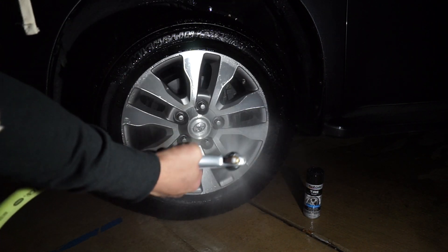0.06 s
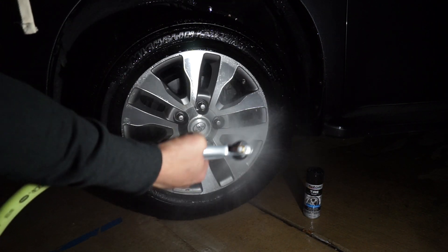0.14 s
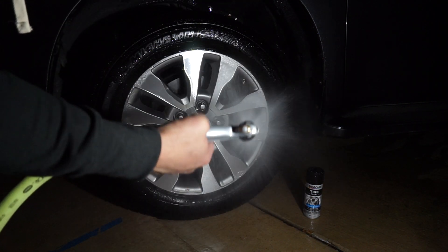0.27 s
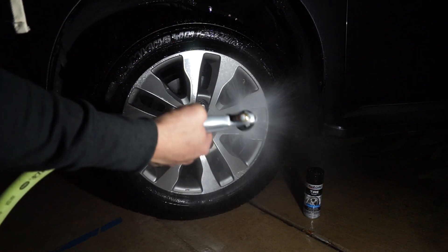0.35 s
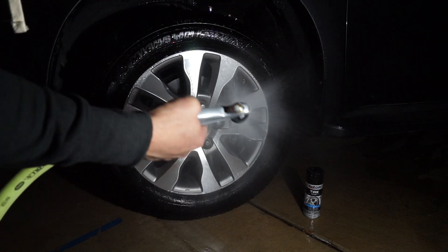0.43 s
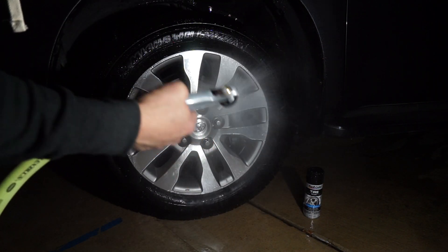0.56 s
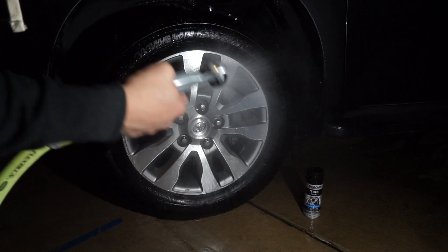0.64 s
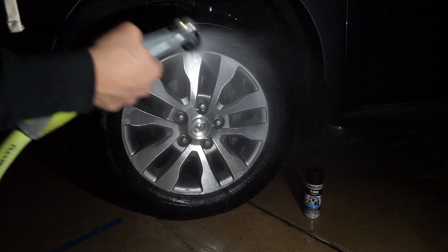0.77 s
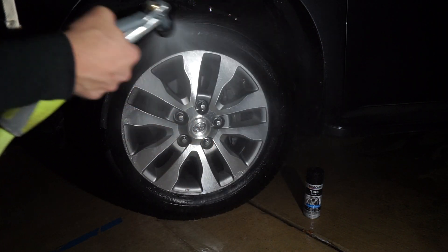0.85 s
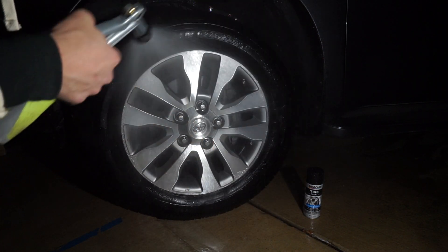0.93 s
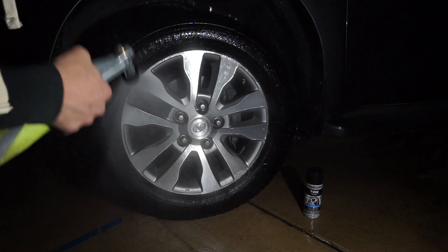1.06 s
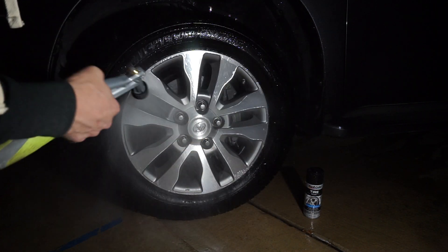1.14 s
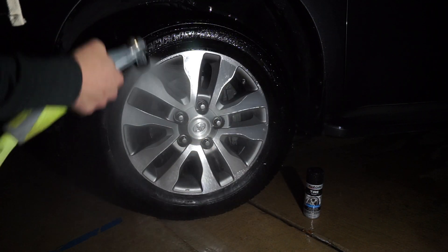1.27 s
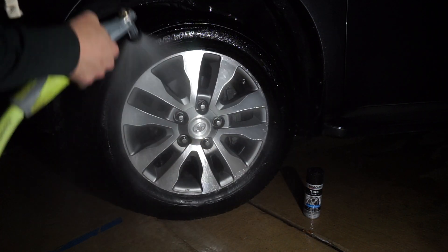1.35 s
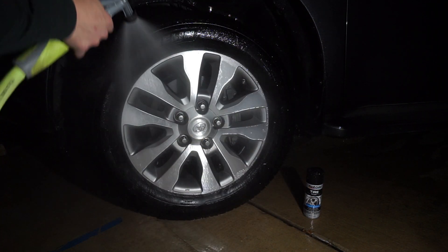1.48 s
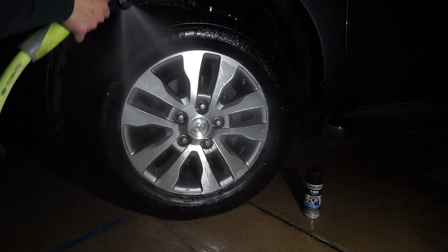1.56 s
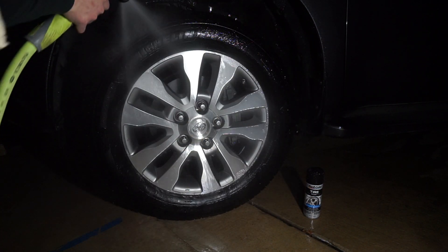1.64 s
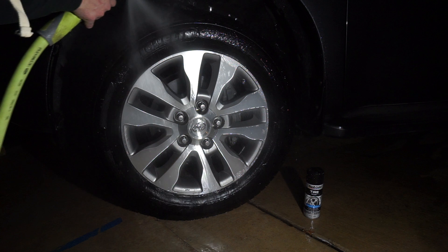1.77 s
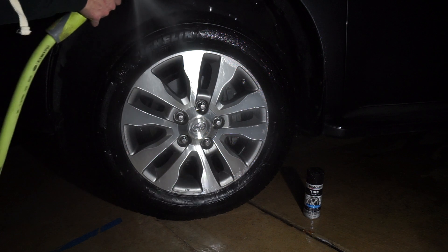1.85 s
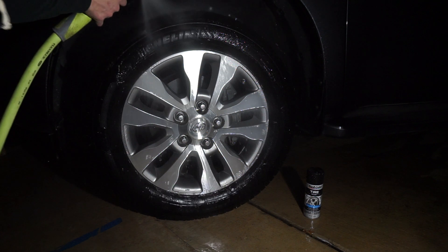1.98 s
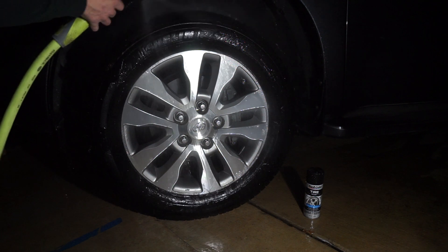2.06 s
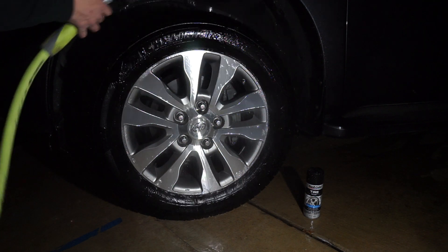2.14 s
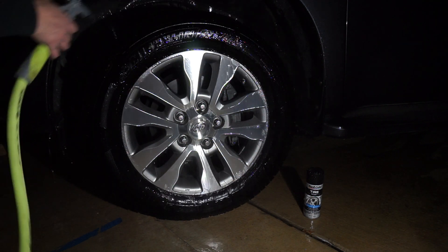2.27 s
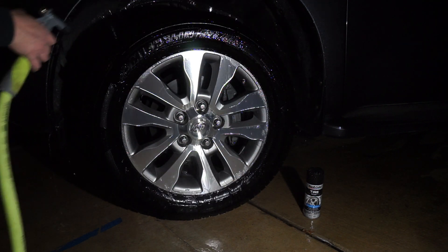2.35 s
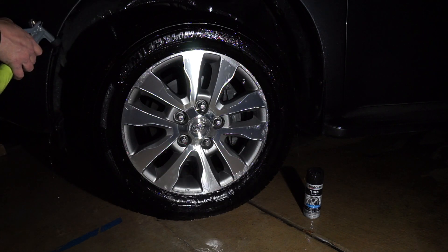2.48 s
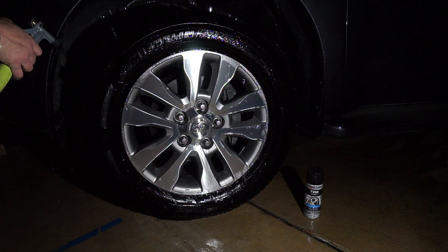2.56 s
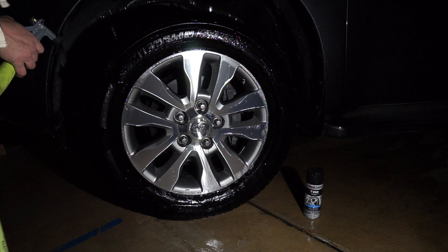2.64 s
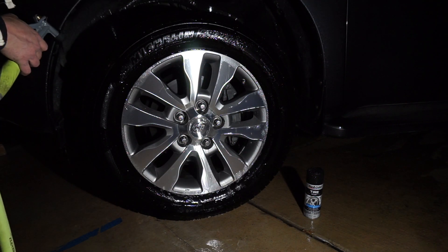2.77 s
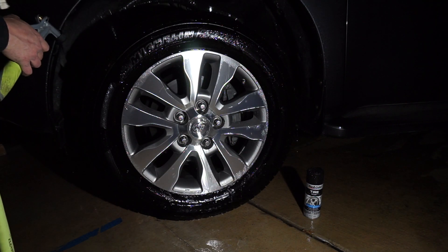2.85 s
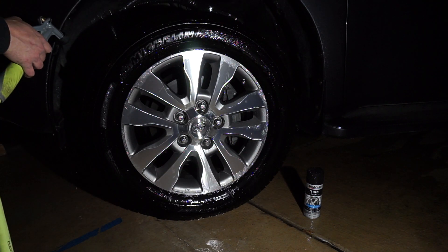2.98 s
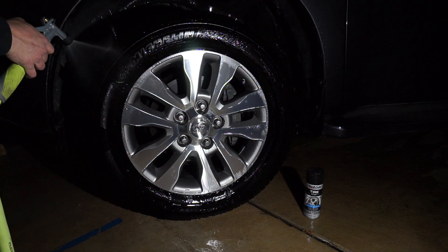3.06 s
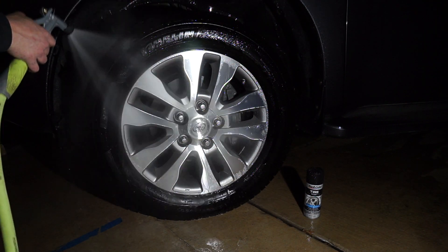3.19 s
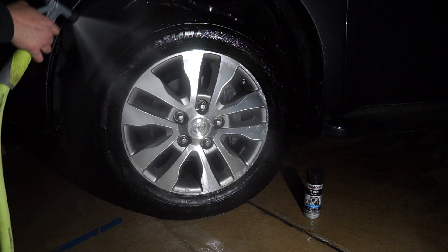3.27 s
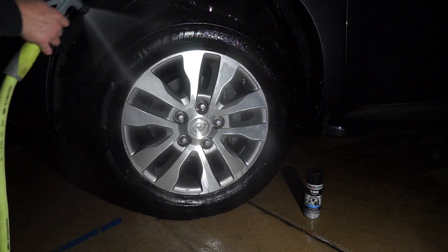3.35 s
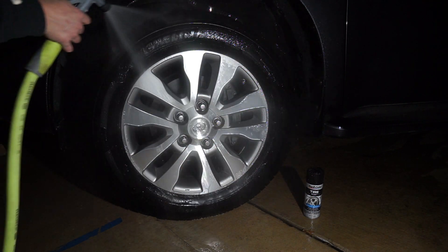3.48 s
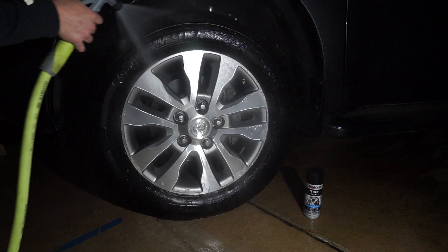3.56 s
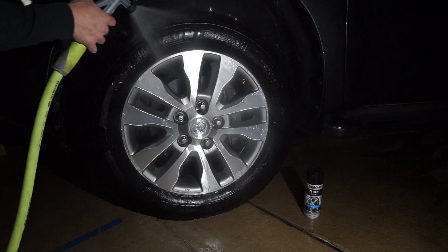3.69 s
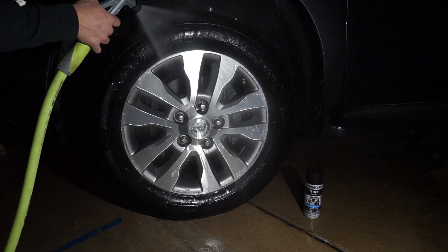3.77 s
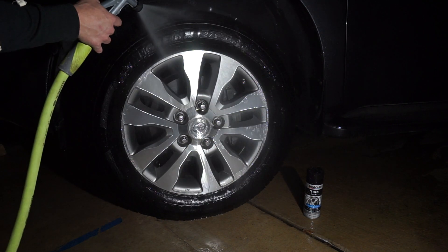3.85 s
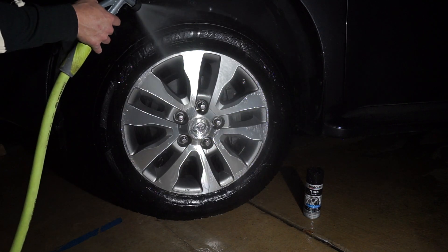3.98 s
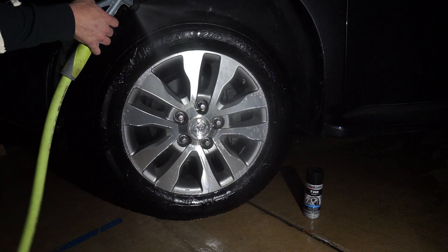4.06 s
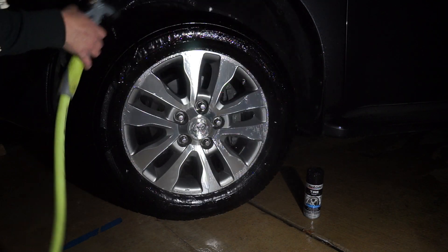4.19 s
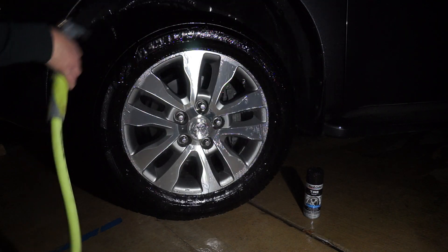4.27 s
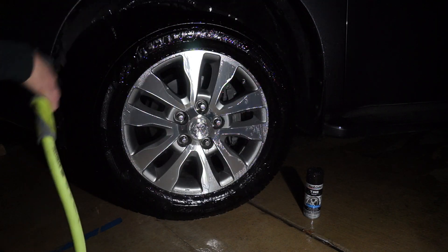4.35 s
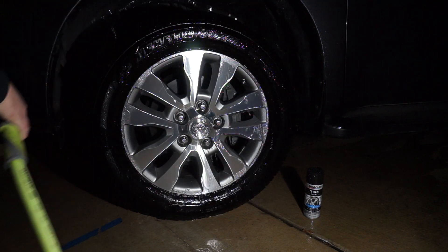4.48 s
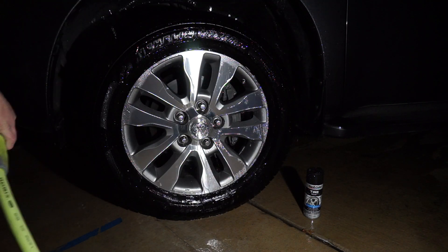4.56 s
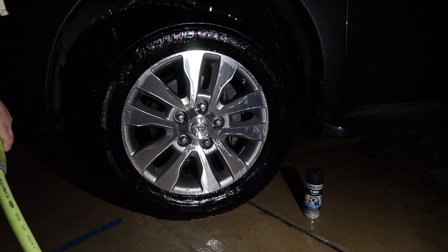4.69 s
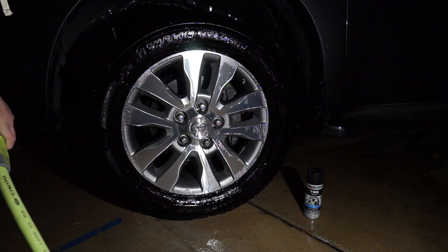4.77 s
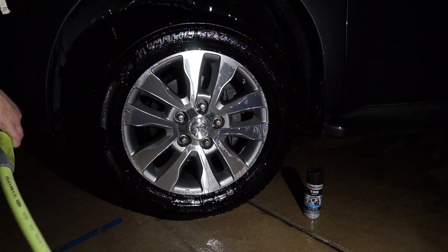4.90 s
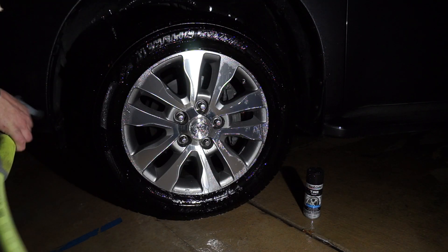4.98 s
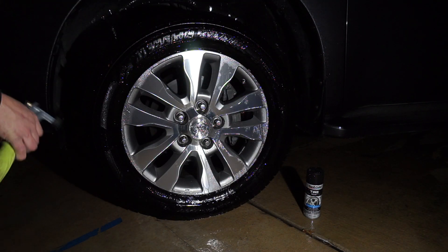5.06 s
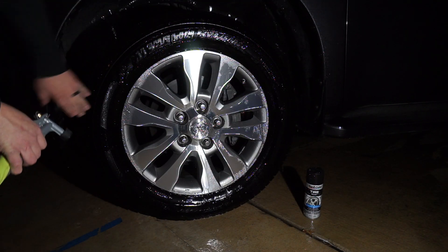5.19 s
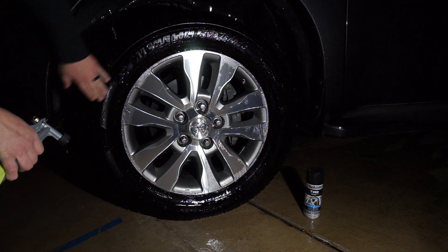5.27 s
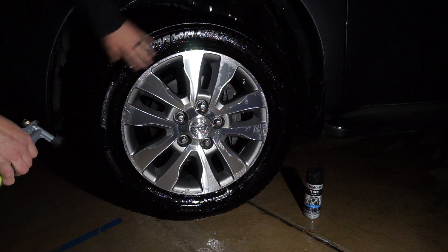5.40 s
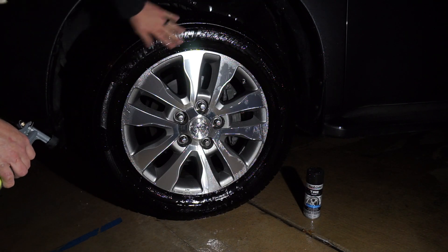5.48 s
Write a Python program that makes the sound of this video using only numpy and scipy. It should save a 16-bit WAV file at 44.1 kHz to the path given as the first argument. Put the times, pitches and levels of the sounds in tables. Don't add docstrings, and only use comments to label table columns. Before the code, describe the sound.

From 0 to 2.1 s a hose nozzle is already spraying: dense, bright hiss with coarse drops pelting metal spokes, a shifting narrow ring around 2 to 2.8 kHz and hollow rim resonance, strongest near 0.2-0.5 s and again at 1.1-1.5 s. The spray shuts off quickly, leaving fizzing, gurgling run-off, small rising bubble plinks and crisp drop splats until 3.0 s over faint distant traffic rumble. At about 3.1 s the spray snaps back, less metallic, drumming on tyre; from 3.4 s the sheet metal thuds and hums near 350 Hz. It stops at 4.1 s with a slosh and brief ringing decay. A soft low hose slap comes at 4.4 s, then thin trickle and scattered drips, the sharpest around 4.98 s. From 5.4 s to the end, a hand rubs and squeaks on wet rubber, rising then falling in pitch. Close stereo, leaning left, with short diffuse outdoor echoes.

```python
import sys
import numpy as np
from scipy import signal
from scipy.fft import rfft, irfft, next_fast_len
from scipy.io import wavfile
from scipy.ndimage import uniform_filter1d, map_coordinates

SR = 44100
rng = np.random.default_rng(int(sys.argv[2]) if len(sys.argv) > 2 else 0)


def transcribe(u):
    v = np.clip(np.atleast_2d(u).T, -1, 1)
    q = np.round(v * 32767).astype(np.int16)
    wavfile.write(sys.argv[1], SR, q)


def ratio(d):
    e = np.asarray(d, float) / 20
    return 10 ** e


N = 243927
TIME = np.arange(N) / SR
SIZE = next_fast_len(N + SR)
HZ = np.maximum(np.arange(SIZE // 2 + 1) * SR / SIZE, 1)

# (frequency [Hz], left-right likeness [0-1])
NEAR_ALIKE = [(60, 0.92), (130, 0.98), (290, 1), (640, 0.95), (1410, 0.86), (3100, 0.79), (6820, 0.57),
              (15000, 0.69)]
# (frequency [Hz], left-right likeness [0-1])
FAR_ALIKE = [(60, 0.9), (130, 1), (290, 0.9), (640, 0.6), (1410, 0.37), (3100, 0.14), (6820, 0.087),
             (15000, 0.45)]
DROPS_OPEN_POWER = 2.7


def rms_one(x):
    return x / np.sqrt(np.mean(x ** 2) + 1e-20)


def in_time(*tables):
    s, *columns = np.concatenate(tables).T
    return [np.interp(TIME, s, column) for column in columns]


def at_hz(points):
    hz, value = np.transpose(points)
    return np.interp(np.log(HZ), np.log(np.maximum(hz, 1)), value)


def sides(pan_db):
    return ratio(np.array([pan_db / 2, -pan_db / 2]))


def drift(rate):
    knots = rng.standard_normal(int(N / SR * 60) + 9)
    coarse_time = TIME[::64]
    place = np.minimum(coarse_time * rate, len(knots) - 3)
    return np.interp(TIME, coarse_time, map_coordinates(knots, [place], order=3))


def held(rows, on_db_per_s, off_db_per_s):
    levels = []
    for start, stop, db in rows:
        rise = on_db_per_s * np.maximum(start - TIME, 0)
        fall = off_db_per_s * np.maximum(TIME - stop, 0)
        levels.append(db - rise - fall)
    return np.max(levels, axis=0)


def valve(off_db_per_s, power):
    # (squeezed [s], let go [s])
    sprays = [
        (-1.0, 2.093),
        (3.055, 4.116),
    ]
    open_s = 0.081
    flow = 0
    for start, stop in sprays:
        opening = np.clip((TIME - start) / open_s, 0, 1) ** power
        flow = flow + opening * ratio(-off_db_per_s * np.maximum(TIME - stop, 0))
    return flow


def two_ports(mid, side, alike):
    # (frequency [Hz], lead of the left [rad])
    port_phase = [(20, 0), (2700, 0), (3450, .6), (4900, 1.8), (5900, 2.1), (7150, .1), (11300, .4),
                  (16000, .3)]
    likeness = np.clip(at_hz(alike), 0, .998)
    turn = np.exp(.5j * at_hz(port_phase))
    common, apart = np.sqrt(1 + likeness) * mid, np.sqrt(1 - likeness) * side
    return np.array([(common + apart) * turn, (common - apart) / turn])


def drops(colour, alike, modes=(), patchy_db=None, lumps_db=3.0):
    size = ratio(lumps_db * np.minimum(rng.exponential(1, N), 4))
    low_hz, high_hz = np.array(colour)[[0, -1], 0]
    gain = ratio(at_hz(colour)) / (1 + (low_hz / HZ) ** 6) / (1 + (HZ / high_hz) ** 6)
    ringing = 1
    for hz, width_hz, db in modes:
        ringing = ringing + (ratio(db) - 1) / (1 + (2 * (HZ - hz) / width_hz) ** 2)
    pair = gain * ringing * two_ports(*rfft(rng.standard_normal((2, N)) * size, SIZE), alike)
    if patchy_db is None:
        return rms_one(irfft(pair, SIZE)[:, :N])
    out, together, place = 0, drift(4.63), 2 * np.log2(HZ)
    for band in range(int(2 * np.log2(low_hz)), int(2 * np.log2(high_hz)) + 2):
        window = np.cos(np.pi / 2 * np.clip(place - band, -1, 1)) ** 2
        flicker = ratio(patchy_db * (0.38 * together + drift(14.0)))
        out = out + irfft(pair * window, SIZE)[:, :N] * flicker
    return rms_one(out)


def traffic():
    # (frequency [Hz], density [dB/Hz])
    road_colour = [(12, -60), (20, -28.5), (120, -2), (177, -3.5), (220, -10), (298, -7.5), (362, -16.5),
                   (459, -14.5), (501, -15), (621, -17.5), (723, -16.5), (999, -14.5), (1570, -25),
                   (1830, -26), (3500, -29), (4550, -67), (7700, -120)]
    rest_db, duck_db, recover_s = -51.5, -4.5, 0.25
    level_db = rest_db + duck_db * valve(20 / recover_s, DROPS_OPEN_POWER)
    return ratio(level_db) * drops(road_colour, FAR_ALIKE, lumps_db=0.5) * sides(0.56)[:, None]


def yard(x):
    t60_s, level_db, first_return_s = 0.59, -15, .008
    t = np.arange(SR) / SR
    dull = signal.lfilter([1], [1, -.4], rng.standard_normal((2, SR)))
    tail = dull * ratio(-60 * t / t60_s) * (t > first_return_s)
    tail = tail / np.sqrt(np.sum(tail ** 2, axis=1, keepdims=True))
    response = two_ports(*rfft(tail, SIZE), FAR_ALIKE)
    return ratio(level_db) * irfft(rfft(x.mean(axis=0), SIZE) * response, SIZE)[:, :N]


def hose():
    start_s, peak_db, t60_s = 4.378, -41, 0.2
    t = np.maximum(TIME - start_s, 0)
    band = signal.butter(2, [95, 230], "band", fs=SR, output="sos")
    dull = rms_one(signal.sosfilt(band, rng.standard_normal(N)))
    return ratio(peak_db - 60 * t / t60_s) * (1 - np.exp(-t / .01)) * dull


def ticks(per_s=81.0):
    t60_s = .015
    born = (rng.random(N) < per_s / SR) * ratio(3.0 * np.minimum(rng.exponential(1, N), 2.5))
    envelope = signal.lfilter([1], [1, -ratio(-60 / (t60_s * SR))], born + 1e-18)
    spit = envelope * rng.standard_normal((2, N))
    treble = signal.butter(3, 8500, "high", fs=SR, output="sos")
    return rms_one(signal.sosfilt(treble, spit + .8 * spit[::-1]))


def trickle():
    # (from [s], to [s], fizz [dB], gurgle [dB])
    runs = [
        (2.3, 2.42, -56, -56),
        (2.45, 2.9, -57.5, -58.5),
        (4.3, 4.42, -59, -62),
        (4.45, 4.75, -66, -72),
        (4.857, 5.4, -59.5, -69.5),
    ]
    # (time [s], level [dB])
    slosh_times = [
        (2.635, -49.5),
        (4.2, -41),
        (4.39, -52.5),
    ]
    # (frequency [Hz], density [dB/Hz])
    fizz_colour = [(2350, -45), (4000, -12), (4240, -3), (4500, -2), (7310, -11), (14700, -4.5),
                   (15800, -3), (16400, -23)]
    gurgle_colour = [(820, -29), (1400, -5), (2910, -1.5), (3870, -7), (4210, -8), (4510, -21), (6000, -25),
                     (7800, -58), (13200, -120)]
    slosh_colour = [(500, -15), (650, -8.5), (1000, -10), (1500, -7)]
    on_db_per_s, off_db_per_s = 80, 51
    fizz_db = held([(a, b, db) for a, b, db, _ in runs], on_db_per_s, off_db_per_s)
    gurgle_db = held([(a, b, db) for a, b, _, db in runs], on_db_per_s, off_db_per_s)
    slosh_db = held([(s, s, db) for s, db in slosh_times], 330, 73)
    fizz = drops(fizz_colour, FAR_ALIKE, patchy_db=1.8) + ratio(-9) * ticks()
    gurgle = drops(gurgle_colour, FAR_ALIKE, patchy_db=3.0, lumps_db=4.5)
    slosh = drops(slosh_colour, FAR_ALIKE, patchy_db=1.8, lumps_db=4.5)
    water = ratio(fizz_db - 6.5) * fizz + ratio(gurgle_db - 3.5) * gurgle + ratio(slosh_db) * slosh
    return water * sides(1.8)[:, None]


def plinks():
    # (time [s], peak [dB], frequency [Hz])
    bubbles = [(2.318, -44, 4400), (2.35, -38, 2710), (2.54, -37.5, 3280), (2.552, -44, 3800),
               (2.632, -46, 3380), (2.682, -46, 2900), (2.71, -42, 2300), (2.776, -39, 1890),
               (3.075, -43, 1990), (4.591, -46, 2500), (4.63, -48, 2830), (5.05, -52, 3200),
               (5.105, -46, 2140), (2.42, -43, 2590), (2.74, -49, 2100), (4.355, -49, 2900),
               (4.45, -52, 2300), (4.9, -50, 2400), (5.125, -50, 2450)]
    ring_cycles = 55
    out, t = np.zeros(N + SR), np.arange(SR // 10) / SR
    for s, db, hz in bubbles:
        t60 = ring_cycles / hz
        envelope = ratio(db - 1.0 - 60 * t / t60) * (1 - np.exp(-t / 0.0013))
        out[round(s * SR):][:len(t)] += envelope * np.sin(2 * np.pi * hz * t * (1 + .1 * t / t60))
    return out[:N] * sides(1.5)[:, None]


def splats():
    # (time [s], peak [dB], low edge [Hz], high edge [Hz],
    # splash t60 [s])
    bursts = [
        (2.508, -45, 3000, 13100, 0.28),
        (2.777, -55, 2500, 15000, .06),
        (2.858, -43, 2010, 9700, 0.21),
        (2.906, -44, 2000, 9400, 0.26),
        (3.074, -48, 1500, 16000, 0.099),
        (4.484, -51, 8100, 15600, 0.29),
        (4.709, -51, 3500, 16000, 0.82),
        (4.935, -51, 3000, 16000, .06),
        (4.977, -41.5, 2010, 13000, 0.46),
        (5.31, -46.5, 2200, 10400, 0.22),
    ]
    # (time [s], peak
    # [dB], centre [Hz], left-right [dB])
    spits = [(2.347, -53, 9400, 6), (2.386, -48, 13300, 8), (2.458, -53, 12600, 0), (2.488, -55, 12600, 2),
             (2.592, -51, 9200, 0), (2.652, -56, 11600, 2), (2.755, -53, 14000, 2),
             (3.016, -56.5, 11200, -4), (4.32, -54, 7700, 0), (4.392, -48, 8400, -5),
             (4.592, -57, 9900, -6), (4.63, -62, 9800, 2), (4.765, -51, 11300, 2), (4.977, -36, 10900, -7),
             (5.124, -46, 9200, 0), (5.187, -50, 11600, 2), (5.274, -55, 14000, 0), (5.347, -54, 11600, -3)]
    spit_width, spit_t60_s, big_pan_db = 1.22, .055, -1
    rows = [(*row, big_pan_db) for row in bursts]
    for s, db, hz, pan_db in spits:
        rows.append((s, db, hz / spit_width, hz * spit_width, spit_t60_s, pan_db))
    out, t = np.zeros((2, N + SR)), np.arange(SR // 3) / SR
    for s, db, low_hz, high_hz, t60, pan_db in rows:
        mid, side = rng.standard_normal((2, len(t)))
        landing, patter = ratio(1.5 - 60 * t / .017), ratio(-7.5 - 60 * t / (1.6 * t60))
        shape = (1 - np.exp(-t / .0006)) * (landing + patter)
        band = signal.butter(5, [low_hz, min(high_hz * 1.04, .45 * SR)], "band", fs=SR, output="sos")
        burst = signal.sosfilt(band, np.array([mid + 0.8 * side, mid - 0.45 * side]))
        out[:, round(s * SR):][:, :len(t)] += ratio(db - 1.5) * rms_one(burst) * shape * sides(pan_db)[:, None]
    return out[:, :N]


def hand():
    # (time [s], slip rate [Hz], rubbing level [dB])
    strokes = [(5.38, 1397, -65), (5.405, 1570, -51), (5.425, 1700, -49), (5.44, 1900, -40.5),
               (5.462, 1945, -36.5), (5.478, 1740, -38.5), (5.495, 1563, -38), (5.515, 1420, -46.5),
               (5.53, 1270, -37)]
    # (frequency [Hz], density [dB/Hz])
    rub_colour = [(710, -47), (1200, -17), (1600, -8), (1920, -6), (2070, -10), (2910, -14), (3360, -7),
                  (4140, -8), (5810, -6.5), (7640, -16.5), (11700, -4), (15700, -8), (16400, -38)]
    squeak_s, squeak_db, octave_db = 5.42, -50, -3
    grab_s, grab_db = 5.528, 15
    slip_hz, rub_db = in_time(strokes)
    level_db = held([(squeak_s, N / SR, squeak_db)], 600, 0)
    octave_db = np.maximum(octave_db, held([(grab_s, N / SR, grab_db)], 1300, 0))
    jitter = rms_one(uniform_filter1d(rng.standard_normal(N), size=80))
    phase = 2 * np.pi * np.cumsum(slip_hz * (1 + .03 * jitter)) / SR
    squeak = 0
    for k, db in enumerate([0, octave_db, -5, -14], start=1):
        squeak = squeak + ratio(db - 3.5 + 3.2 * drift(55.0)) * np.sin(k * phase)
    film = drops(rub_colour, NEAR_ALIKE, [(11800, 500, 5), (5600, 300, 4)], patchy_db=1.5)
    touching = TIME > strokes[0][0]
    return touching * (ratio(level_db) * squeak + ratio(rub_db) * film) * sides(4.6)[:, None]


def wing():
    # (from [s], to [s], level [dB])
    crossings = [
        (3.43, 3.45, -41),
        (3.56, 3.69, -38),
        (3.78, 3.82, -35.5),
        (3.96, 3.98, -39),
        (4.02, 4.19, -44),
    ]
    # (frequency [Hz], density [dB/Hz])
    panel_colour = [(150, -6), (250, 0), (320, -4), (600, -14), (1100, -16)]
    # (frequency [Hz], width [Hz], level over the colour [dB])
    panel_modes = [(226, 12, 11), (260, 12, 7), (287, 10, 9), (572, 20, 14), (705, 15, 12), (1020, 25, 14)]
    note_hz, builds_s, boom_db, thud_db = 351, 0.2, 2, -5
    note_db = held(crossings, 404, 137)
    shake_db = held(crossings, 80, 91)
    builds = np.clip((TIME - crossings[0][0]) / builds_s, 0, 1)
    note = np.sqrt(2) * np.sin(2 * np.pi * np.cumsum(note_hz + 1.5 * drift(7.0)) / SR)
    boom = drops(panel_colour, NEAR_ALIKE, panel_modes, patchy_db=1.5)
    low_band = signal.butter(2, [65, 198], "band", fs=SR, output="sos")
    thud = rms_one(signal.sosfilt(low_band, rng.standard_normal(N)))
    return ratio(note_db) * note + builds * ratio(shake_db) * (ratio(boom_db) * boom + ratio(thud_db) * thud)


def pocket(width_hz=136.0):
    # (time [s], centre [Hz], level [dB])
    pocket_path = [(0, 2160, -45), (.12, 2047, -33.5), (.5, 2500, -37), (.65, 2500, -53), (.85, 1954, -44),
                   (1.05, 2350, -40.5), (1.42, 2710, -35), (1.7, 2810, -59), (2.05, 2690, -48)]
    centre_hz, level_db = in_time(pocket_path)
    lowpass = signal.butter(2, width_hz, fs=SR, output="sos")
    slow = signal.sosfilt(lowpass, rng.standard_normal((3, N)))
    turn = 2 * np.pi * np.cumsum(centre_hz) / SR
    ring = slow[0] * np.cos(turn) + slow[1] * np.sin(turn)
    apart = 0.5 * slow[2] * np.cos(turn + 1)
    return ratio(level_db) * rms_one(np.array([ring + apart, ring - apart]))


def spray():
    # (time [s], pressure [dB], cone on metal [dB], coarse drops [dB], left-right [dB])
    aim = [
        [(0.0, -27.5, -26, -23.5, 2), (0.1, -26.5, -26.5, -23, 1), (0.45, -26, -26, -23, 1),
         (0.71, -26.5, -27, -21.5, 1), (0.9, -23.5, -27.5, -23, 2), (1.22, -28, -27.5, -23, 2.5),
         (1.5, -25.5, -27, -22.5, 2.5), (1.8, -27, -30.5, -26, 3), (2.08, -23, -30, -22.5, 2.5)],
        [(3.14, -28.5, -37.5, -21.5, 4), (3.3, -30, -32, -23, 4), (3.52, -28, -31, -25, 3.5),
         (3.6, -25.5, -29, -22, 3.5), (3.64, -28, -33, -24, 4), (3.72, -25.5, -30.5, -25.5, 3),
         (3.85, -24.5, -30.5, -25.5, 3.5), (4.01, -25.5, -32, -26, 2.5), (4.09, -26, -33, -25.5, 3.5)],
    ]
    # (from [s], to [s], level [dB])
    on_hollow = [
        (0.22, 0.5, -32),
        (1.12, 1.5, -35.5),
        (3.58, 3.62, -36),
        (3.83, 3.87, -35.5),
        (4.08, 4.1, -34.5),
    ]
    on_tyre = [
        (0.0, 1.55, -42),
        (1.601, 2.13, -45),
        (3.14, 3.22, -58),
        (3.27, 3.4, -50.5),
        (3.44, 3.45, -37),
        (3.58, 3.9, -37),
        (3.95, 4.25, -41),
    ]
    # (frequency [Hz], density [dB/Hz])
    mist_colour = [(2650, -43), (4500, -6), (6540, -12.5), (10600, -1), (14600, 0), (15200, 2.5),
                   (16100, -27), (16400, -40)]
    spoke_colour = [(530, -40), (900, -4.5), (1190, -4.5), (1410, -0.5), (1680, -1.5), (2480, -1.5),
                    (4040, -3), (4840, -12.5), (7000, -11), (9100, -68), (15400, -120)]
    hollow_colour = [(620, 2), (670, 3.5), (850, 1), (930, -3.5), (1100, -2.5)]
    tyre_colour = [(25, -30), (35, -20), (48, -23), (120, -13.5), (250, -8), (310, -4.5), (450, -3),
                   (660, -0.5)]
    # (frequency [Hz], width [Hz], level over the colour [dB])
    spoke_modes = [(1900, 120, 1), (2300, 63, 0.5), (2500, 160, 2), (3040, 270, 1)]
    hollow_modes = [(665, 13, 2.1), (767, 13, 1), (820, 13, 1.7)]
    pressure_db, metal_db, coarse_db, pan_db = in_time(*aim)
    fine = valve(394, 1.9)
    heavy = valve(155, DROPS_OPEN_POWER)
    body = valve(85, DROPS_OPEN_POWER)
    hollow = np.hypot(ratio(held(on_hollow, 80, 75)), ratio(metal_db - 14))
    tyre = ratio(held(on_tyre, 320, 75))
    mist = drops(mist_colour, NEAR_ALIKE)
    coarse_band = signal.butter(2, [4500, 8200], "band", fs=SR, output="sos")
    coarse = signal.sosfiltfilt(coarse_band, mist)
    water = fine * ratio(pressure_db + 1.0) * (mist - coarse) + heavy * ratio(coarse_db) * coarse
    water += heavy * ratio(metal_db) * drops(spoke_colour, NEAR_ALIKE, spoke_modes, lumps_db=2.1)
    water += body * hollow * ratio(-1.4) * drops(hollow_colour, NEAR_ALIKE, hollow_modes, patchy_db=-1.0)
    water += body * tyre * ratio(1.5) * drops(tyre_colour, NEAR_ALIKE, patchy_db=1.0)
    water += wing() + heavy * pocket()
    return water * sides(pan_db)


def scene():
    near = spray() + splats() + plinks() + hand()
    return near + yard(near) + trickle() + traffic() + hose()


def roll_off(x):
    return signal.sosfilt(signal.butter(12, 16590, fs=SR, output="sos"), x)


def record(dry):
    mid, side = (dry[0] + dry[1]) / 2, (dry[0] - dry[1]) / 2
    side = side - 0.69 * signal.lfilter(*signal.butter(1, 180, fs=SR), side)
    low_pass = signal.cheby2(24, 70, 16150, fs=SR, output="sos")
    mix = signal.sosfilt(low_pass, np.array([mid + side, mid - side]))
    return roll_off(mix)


dry = scene()
out = record(dry)
transcribe(out)
```